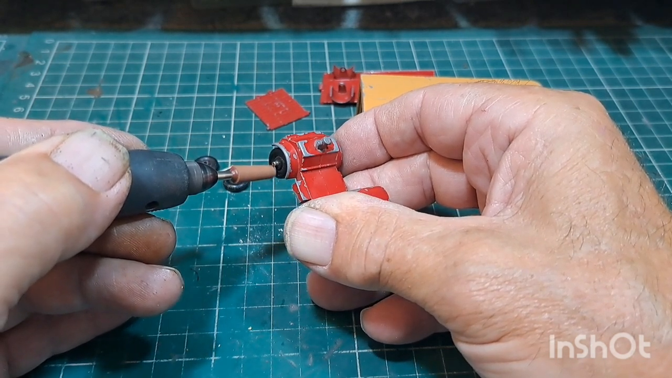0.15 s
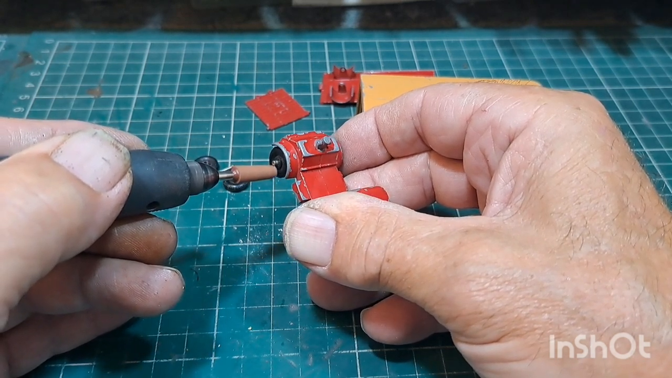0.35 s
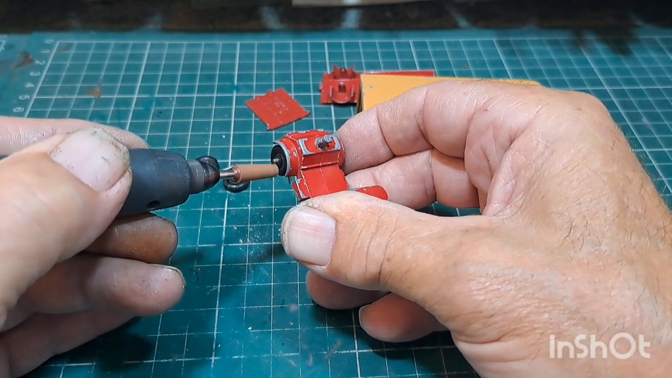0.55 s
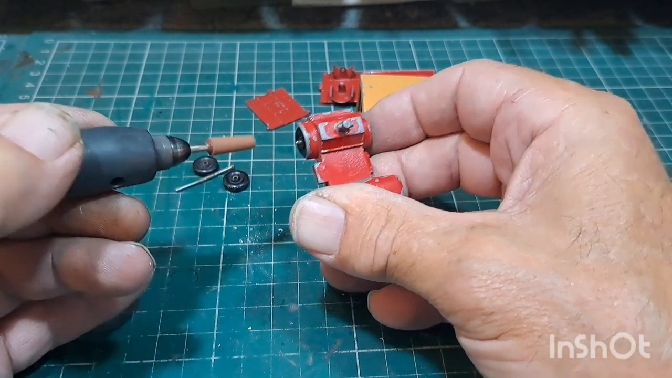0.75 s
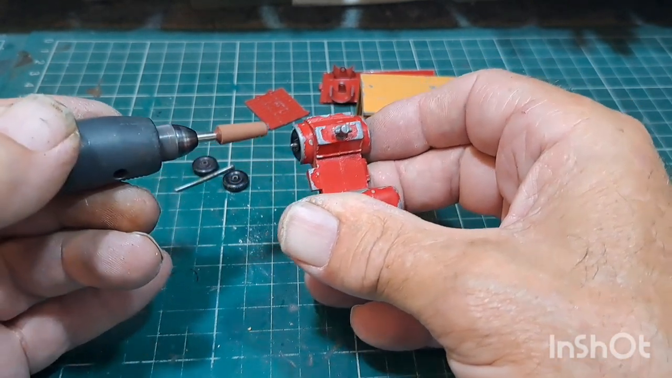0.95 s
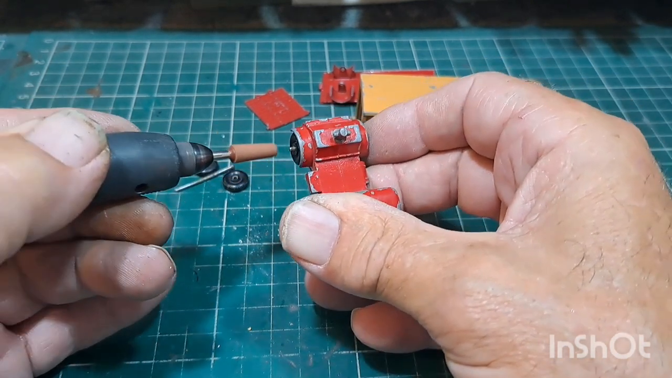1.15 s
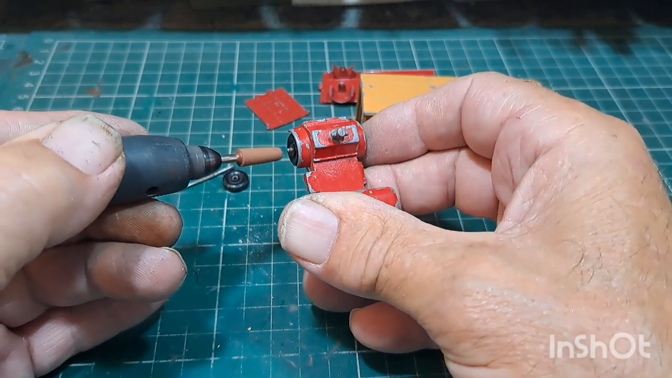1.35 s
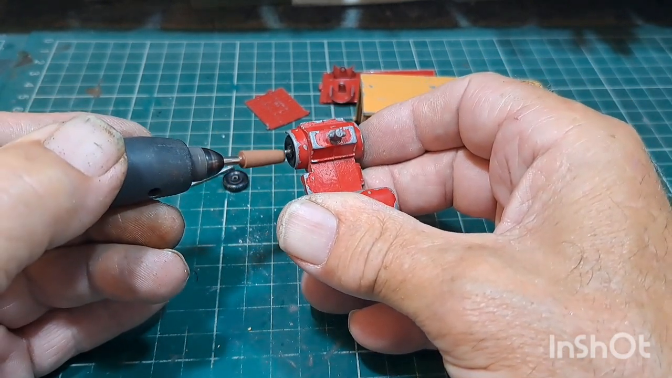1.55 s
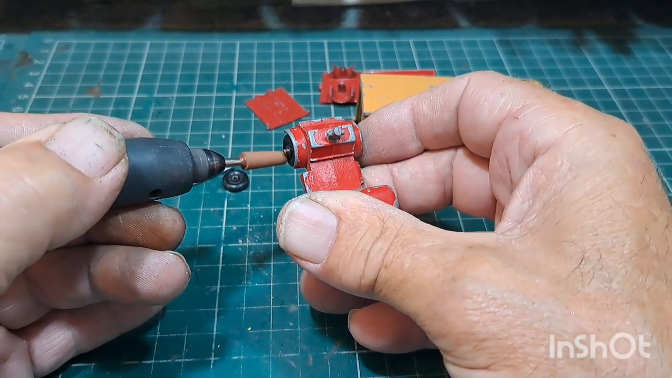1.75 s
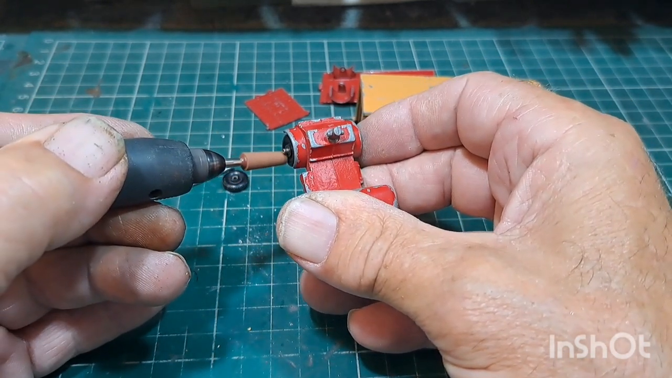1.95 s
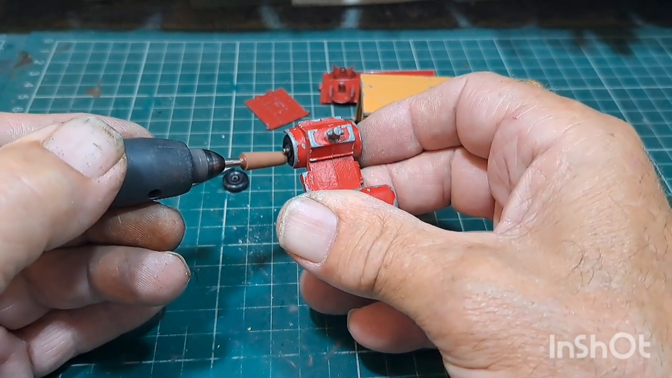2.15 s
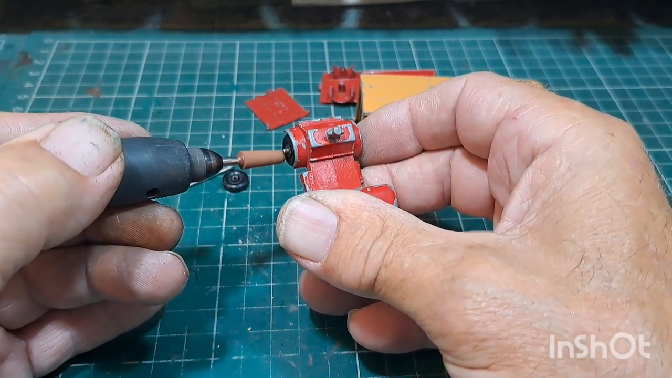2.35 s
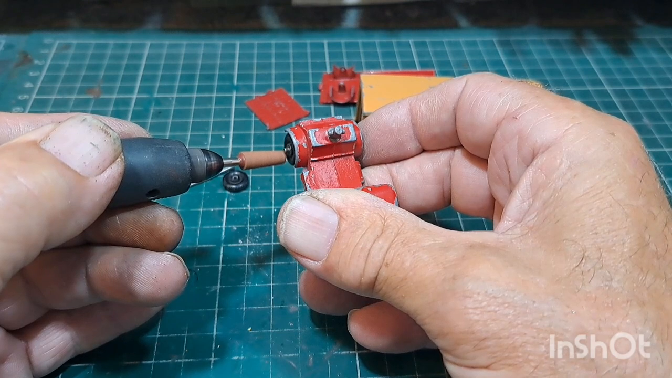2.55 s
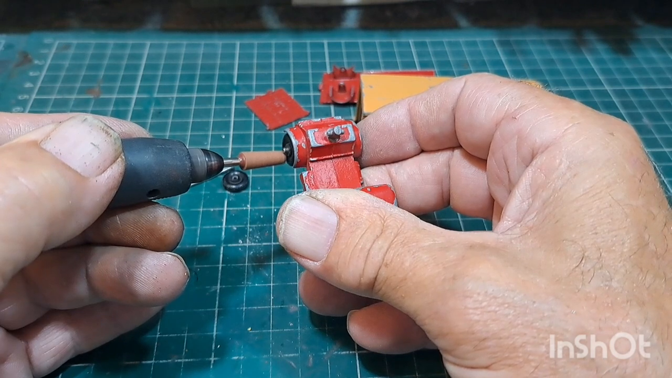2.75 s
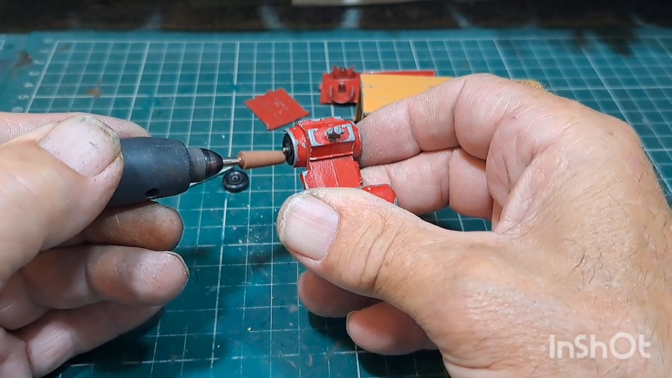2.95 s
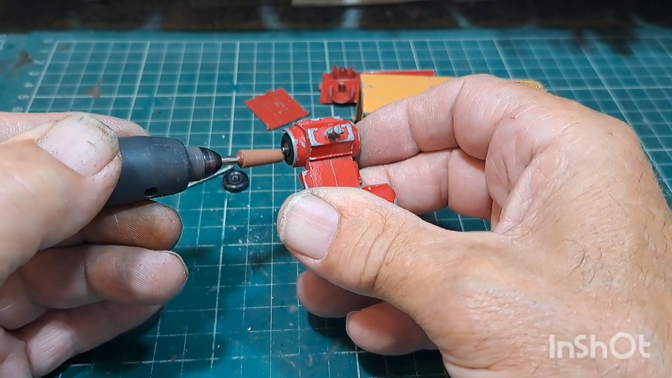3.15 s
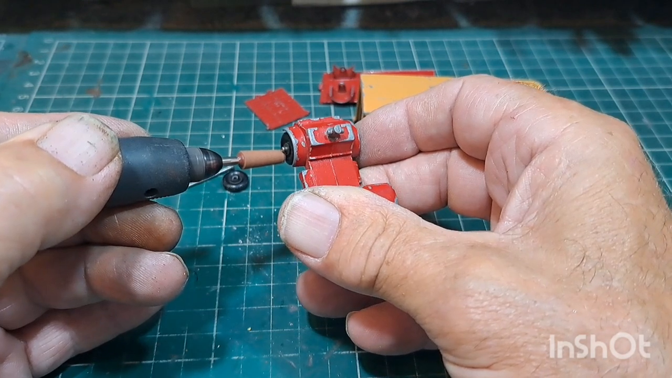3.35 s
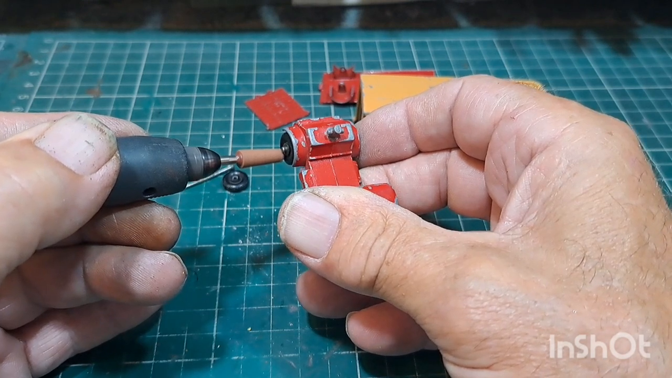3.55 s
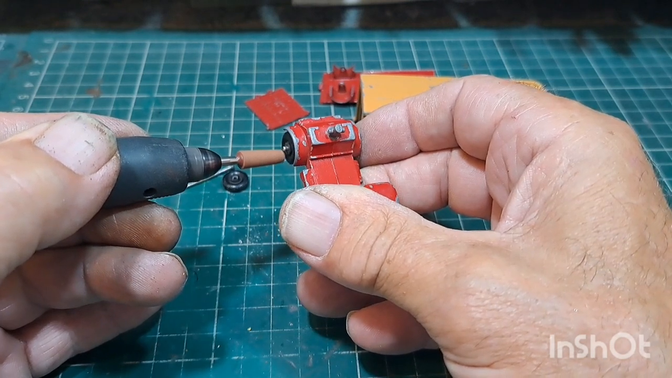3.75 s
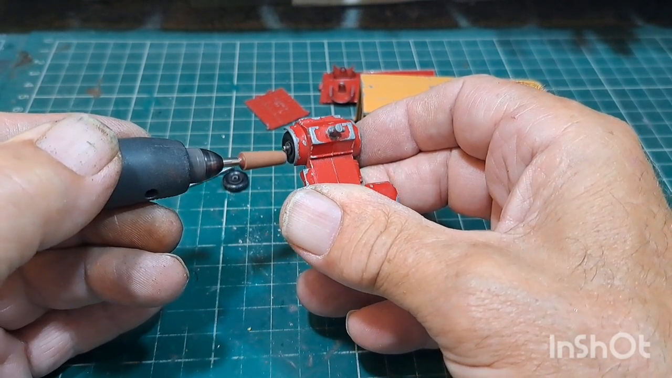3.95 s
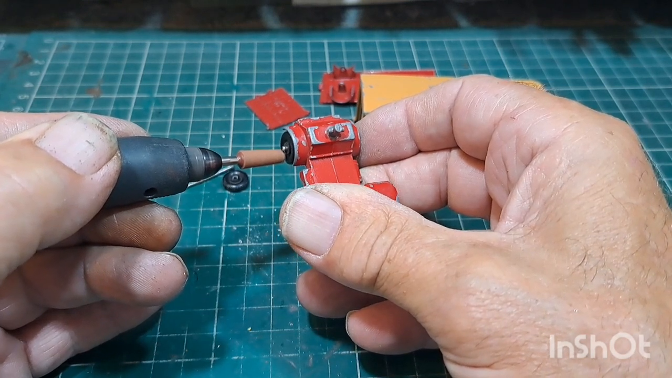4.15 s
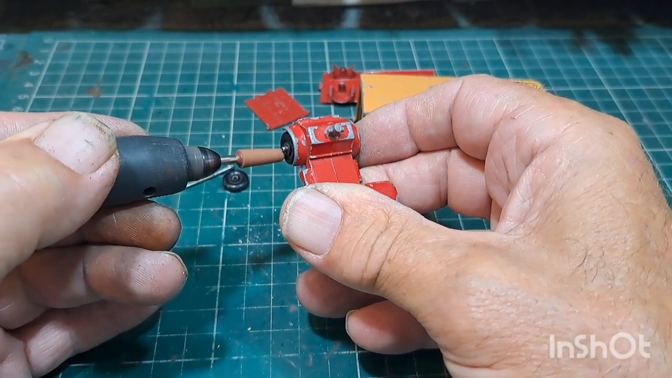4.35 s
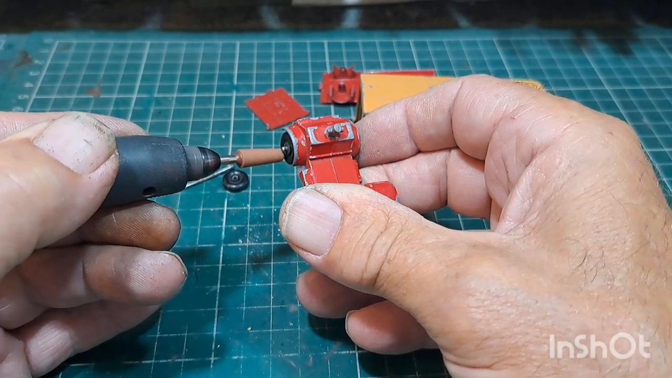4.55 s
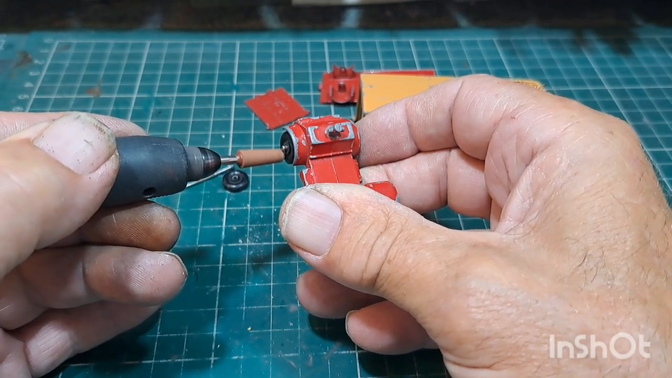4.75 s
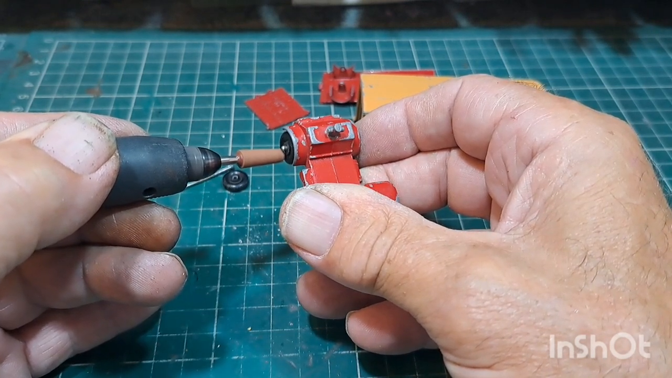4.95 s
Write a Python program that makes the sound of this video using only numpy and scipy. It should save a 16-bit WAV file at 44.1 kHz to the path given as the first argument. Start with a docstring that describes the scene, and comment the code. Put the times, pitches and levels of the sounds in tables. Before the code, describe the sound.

A small handheld rotary tool grinds the end of a metal axle with a bright, buzzing rasp that chatters unevenly. About half a second in, the stone lifts for a second, leaving the motor's soft hum, thin whine and hiss. The grinding returns and runs on, with sharp little bites and a slight metallic ring. It is heard close up at a workbench, over a faint low room rumble.

```python
"""At a workbench, a small rotary tool dresses the end of a metal axle with a grinding stone.
The stone runs out of true and scrapes once a turn; held lightly it bounces, hard and weak in turn.
It is lifted for a second, leaving the motor's hum, bearing whine and brush hiss. The hands knock
softly twice over a low workshop rumble. Bench and room echo the scrape and hiss at two microphones."""
import sys
import numpy as np
from scipy import signal
from scipy.fft import rfft, irfft, next_fast_len
from scipy.io import wavfile
from scipy.ndimage import uniform_filter1d

SR = 44100
rng = np.random.default_rng(int(sys.argv[2]) if len(sys.argv) > 2 else 0)


def to_wav(s):
    """Save 16-bit WAV."""
    ch = np.atleast_2d(s).T  # columns
    pcm = np.round(np.clip(ch, -1, 1) * 32767)  # PCM
    wavfile.write(sys.argv[1], SR, pcm.astype(np.int16))


N = 220617
T = np.arange(N) / SR
MIC_LAG_S = .00032  # the right microphone is further off
FIRM_DB = -18  # feed force of a firm hand


def undb(db):
    """Decibels to gain."""
    return 10 ** (np.asarray(db) / 20)


def unit(x):
    """Scale to rms 1."""
    return x / np.sqrt(np.mean(x ** 2))


def curve(rows):
    """Straight lines through (seconds, value) rows."""
    return np.interp(T, *np.transpose(rows))


def swell(middle_s, half_s):
    """Gaussian rise and fall, peak 1."""
    return np.exp(-((T - middle_s) / half_s) ** 2)


def walk(hz):
    """Smooth random drift, rms 1."""
    step = max(int(SR / hz), 1)
    held = rng.standard_normal(N)[np.arange(N) // step]
    return unit(uniform_filter1d(uniform_filter1d(held, step), step))


def late(x, delay_s):
    """Delay a signal."""
    return np.pad(x, (int(delay_s * SR), 0))[:N]


def pan(x, left_db):
    """Place a sound by its left minus right level."""
    return x * undb(np.array([[left_db], [-left_db]]) / 2)


def resonate(x, hz, width_hz):
    """One resonant mode."""
    return signal.lfilter(*signal.iirpeak(hz, hz / width_hz, fs=SR), x)


def colour(x, spectrum, rings=(), column=1, size=4096):
    """Minimum-phase filter from a (Hz, dB, ..) table, lifted at each ring; unit power gain."""
    freq_hz = np.maximum(np.arange(size // 2 + 1) * SR / size, 1)
    table = np.transpose(spectrum)
    db = np.interp(np.log(freq_hz), np.log(table[0]), table[column])
    db -= 20 * np.log10(1 + (table[0, 0] / 2 / freq_hz) ** 2)  # bass roll-off
    for hz, width_hz, lift_db in rings:
        db += lift_db / (1 + (2 * (freq_hz - hz) / width_hz) ** 2)
    cepstrum = irfft(np.log(undb(db)))
    cepstrum[1:size // 2] *= 2
    cepstrum[size // 2 + 1:] = 0
    response = irfft(np.exp(rfft(cepstrum)))
    return signal.fftconvolve(x, response / np.linalg.norm(response))[:N]


def trail(power, t60_s):
    """Spread a power curve over an exponential decay, keeping its energy."""
    decay = np.exp(-2 * np.log(1000) * T[:SR // 2] / t60_s)
    return np.abs(signal.fftconvolve(power, decay / decay.sum())[:N])


def paths(x, spectrum, rings, near_db, near_t60_s, room_db, room_t60_s):
    """Direct sound, early echoes and a diffuse tail off bench and room, coloured per microphone."""
    # Echoes off bench and hands. Each row: left delay in seconds, right delay in seconds, level in dB.
    echoes = [(.00062, .00121, -10.5), (.00187, .00093, -17.5), (.0031, .00263, -11.5), (.0044, .0053, -11)]
    tail_power = undb(near_db) ** 2 * trail(x ** 2, near_t60_s)
    tail_power += undb(room_db) ** 2 * trail(x ** 2, room_t60_s)
    out = []
    for side in range(2):
        early = x + sum(undb(db) * late(x, delays_s[side]) for *delays_s, db in echoes)
        heard = late(early, side * MIC_LAG_S) + np.sqrt(tail_power) * rng.standard_normal(N)
        out.append(colour(heard * x.std() / heard.std(), spectrum, rings, column=side + 1))
    return np.array(out)


def workshop(room_db=-58, mains_db=-60, mains_hz=100, drone_hz=57):
    """Low rumble, nearly alike on both sides, faint mains hum and a drone that swells twice."""
    # Room rumble. Each row: frequency in Hz, relative density in dB.
    spectrum = [(25, -19), (55, 3), (85, -4.5), (120, -3.5), (170, -0.5), (240, -6.5), (330, -7.5),
                (480, -4.5), (800, -22), (2000, -21)]
    # Drone swells. Each row: middle in seconds, half length in seconds, level in dB.
    swells = [(1.1, .2, -58), (2.03, .08, -58)]
    mid, side = (colour(rng.standard_normal(N), spectrum) for _ in range(2))
    rumble = undb(room_db + 1.7 * walk(4.7)) * (mid + 0.42 * side * np.array([[1], [-1]]))
    drone_gain = sum(undb(db) * swell(middle_s, half_s) for middle_s, half_s, db in swells)
    drone = drone_gain * np.sin(2 * np.pi * drone_hz * T)
    mains = undb(mains_db) * np.sin(2 * np.pi * mains_hz * T)
    return pan(rumble + np.sqrt(2) * (mains + drone), left_db=-2.5)


def knocks():
    """Dull, short knocks as the hands shift."""
    # Knocks. Each row: start in seconds, level in dB, tilt in dB per octave.
    hits = [(0.918, -42, 5.5), (3.784, -43, -16)]
    # Modes of the knocked body. Each row: frequency in Hz, relative level in dB, T60 in seconds.
    modes = [(392, 0.5, 0.1), (450, -6, 0.056), (658, -7, 0.11)]
    out = np.zeros(N)
    for start_s, db, tilt_db in hits:
        age_s = np.maximum(T - start_s, 0)
        for hz, mode_db, t60_s in modes:
            gain = undb(db + mode_db + tilt_db * np.log2(hz / modes[0][0]))
            out += gain * np.exp(-np.log(1000) * age_s / t60_s) * np.sin(2 * np.pi * hz * age_s)
    return pan(out, left_db=-4)


def brief_rush(level_db=-52):
    """A brief, narrow rush that swells and fades."""
    rush = unit(resonate(rng.standard_normal(N), hz=4850, width_hz=300))
    return pan(undb(level_db) * swell(middle_s=1.05, half_s=.15) * rush, left_db=8)


def shaft(load, free_hz=183.5, sag_hz=1.45, inertia_s=0.1):
    """Turns so far; the speed sags under load (1 = a firm hand), lagged by inertia."""
    pole = np.exp(-1 / (inertia_s * SR))
    drag, _ = signal.lfilter([1 - pole], [1, -pole], load, zi=[.5])
    return np.cumsum(free_hz - sag_hz * drag) / SR


def motor(turns, hum_db=-0.2, octave_db=-1, waver_db=1.5, slip_rad=0.67):
    """Unbalance hums at the shaft rate and its octave; bearing lines waver as the balls slip."""
    # Shaft hum. Each row: time in seconds, level in dB before hum_db.
    hum_levels = [(0, -46.5), (.45, -46.5), (.7, -47.5), (1.4, -47.3), (2.25, -43.5), (2.45, -47),
                  (3.1, -45.5), (3.64, -49), (3.73, -57), (3.87, -51), (4.87, -50.5), (5, -54)]
    # Its octave. Each row: time in seconds, level in dB before octave_db.
    octave_levels = [(0, -82), (.57, -59), (1.2, -65.5), (1.65, -56.5), (1.9, -61.5), (2.95, -64.5),
                     (3.6, -52.5), (3.95, -69), (4.4, -58.5), (5, -54)]
    # Motor lines. Each row: multiple of the shaft rate (fractional for bearings), level in dB.
    lines = [(3, -70.5), (4.613, -61.5), (5, -98), (5.613, -57), (6, -63.5), (6.613, -58.5), (9.226, -55),
             (10.226, -52.5), (11.226, -55)]
    hum = undb(curve(hum_levels) + hum_db) * np.sin(2 * np.pi * turns)
    octave_gain = undb(curve(octave_levels) + octave_db + 2.6 * walk(12))
    hum += octave_gain * np.sin(4 * np.pi * turns + .5 * walk(30))
    whine = np.zeros(N)
    for multiple, db in lines:
        gain = undb(db + waver_db * walk(14))
        phase = 2 * np.pi * (multiple * turns + rng.random())
        whine += gain * np.sin(phase + slip_rad * walk(25.24))
    return np.sqrt(2) * (pan(hum, left_db=-5.5) + pan(whine, left_db=2.5))


def grit(spread_db):
    """Dense, grainy noise, a few grains much larger than the rest."""
    return unit(rng.standard_normal(N) * undb(spread_db * np.repeat(rng.standard_normal(N), 6)[:N]))


def brushes(turns, hiss_db=-35.5, ripple=0.18):
    """Brushes and bearings hiss with a restless flutter and a slight ripple each turn."""
    # Brush hiss. Each row: frequency in Hz, left and right relative levels in dB.
    spectrum = [(278, -20, -12.5), (656, -17, -13.5), (990, 0, -6.5), (1540, -6.5, 3), (2140, 5.5, 1),
                (2530, -1.5, -2), (3700, -4.5, -4), (5200, 1.5, -3), (6400, -7, -8.5), (11300, -7.5, -7),
                (11400, 2, -4.5), (13160, -10.5, 1), (14700, -2.5, -38)]
    hiss = grit(spread_db=6.0) * undb(1.27 * walk(300) + 0.21 * walk(19))
    hiss *= 1 + ripple * np.cos(2 * np.pi * turns)
    heard = paths(unit(hiss), spectrum, (), near_db=6.5, near_t60_s=0.012, room_db=4.5, room_t60_s=0.16)
    return undb(hiss_db) * pan(heard, left_db=-0.5)


def hand():
    """Feed force: each stroke eases in, holds and eases off while the hand leans more or less."""
    # Strokes. Each row: touch and lift in seconds, force in dB, attack and release in seconds.
    strokes = [(-.04, 0.622, -22.5, 0.1, 0.054), (1.584, 1.81, -21.5, 0.049, 0.075),
               (1.792, 4.039, -21.5, 0.28, 0.13), (4.049, 4.15, -21, 0.011, 0.032),
               (4.161, 5.1, -22, 0.053, .05)]
    # Lean of the hand. Each row: time in seconds, added force in dB.
    lean = [(.38, -2), (.5, 0), (.6, -2), (2.05, 0.5), (2.12, -1.5), (2.39, 2), (2.48, -3.5), (2.57, 1.5),
            (2.64, -1), (2.95, -0.5), (3.27, 2), (3.43, -3), (3.62, 2.5), (3.87, -3.5), (4.35, -1),
            (4.74, 0), (4.85, 2), (5, 1)]
    feed = np.zeros(N)
    for touch_s, lift_s, db, attack_s, release_s in strokes:
        ramp = np.minimum((T - touch_s) / attack_s, (lift_s - T) / release_s)
        feed += undb(db) * np.clip(ramp, 0, 1)
    return feed * undb(curve(lean))


def bounce(feed, firm_chatter=.3, chatter_per_db=0.04):
    """Chatter 0-1: the lighter the hand, the more the stone bounces."""
    slack_db = FIRM_DB - 20 * np.log10(feed + 1e-9)
    return np.clip(firm_chatter + chatter_per_db * slack_db, 0, 1)


def contacts(turns, chatter, rebound_db=14.5, scatter_db=1.02, wildness=0.75, throw=2.2, jitter_s=.00018):
    """Times and sizes, one contact a turn: a hard one throws the stone off, so the next is weak."""
    times_s = np.interp(np.arange(1, int(turns[-1])), turns, T)
    kick, scatter, jitter = rng.standard_normal((N // 100, 3))[:len(times_s)].T
    looseness = np.interp(times_s, T, chatter)
    swing = np.zeros(len(times_s))
    for k in range(1, len(times_s)):
        swing[k] = np.tanh(wildness * kick[k] - throw * looseness[k] * swing[k - 1])
    sizes = undb(rebound_db * looseness * swing / 2 + scatter_db * scatter)
    sizes /= np.sqrt(uniform_filter1d(sizes ** 2, size=6))  # the hand sets the mean force
    return times_s + jitter_s * jitter, sizes


def pressure(times_s, sizes, rise_s, fall_s, length=600):
    """Sum of contacts, each swelling quickly and letting go more slowly."""
    t = (np.arange(length) - length // 4) / SR
    pulse = np.exp(-np.where(t < 0, (t / rise_s) ** 2, t / fall_s))
    impulses = np.zeros(N)
    np.add.at(impulses, np.clip((times_s * SR).astype(int), 0, N - 1), sizes)
    return np.convolve(impulses, pulse)[length // 4:][:N]


def scrape(uneven_db=4.5):
    """Each abrasive grain meets the metal differently, so five octave bands flicker separately."""
    size = next_fast_len(N)
    grains = rfft(grit(spread_db=3.0), size)
    freq_hz = np.maximum(np.arange(len(grains)) * SR / size, 1)
    octave = np.log2(freq_hz / 1000)
    out = np.zeros(N)
    for share in np.eye(5):
        band = irfft(grains * np.interp(octave, np.arange(5), share), size)[:N]
        out += band * undb(uneven_db * np.tanh(walk(350)))
    return unit(out)


def axle(rub):
    """Two modes of the axle ring with the scraping, most at the first spot ground."""
    # Axle modes. Each row: frequency in Hz, width in Hz.
    modes = [(2170, 260), (5620, 190)]
    # Ringing. Each row: time in seconds, low and high mode levels in dB relative to the rub.
    levels = [(.3, -11.5, -10.5), (.5, -8, -24), (1.6, -16.5, -19), (3.3, -18.5, -19), (5, -25.5, -14.5)]
    out = np.zeros(N)
    for column, (hz, width_hz) in enumerate(modes, start=1):
        ring = resonate(rub, hz, width_hz)
        gain = undb(curve(np.array(levels)[:, [0, column]]))
        out += gain * ring * rub.std() / ring.std()
    return np.array([out, late(out, MIC_LAG_S)])


def grinding(turns, feed, stone_db=1.3, bite_db=-6, bite_rise_s=.0015, drag=0.022, rumble_db=-35):
    """The stone's high side scrapes the axle and at times bites; a firm hand adds drag in between."""
    # Hard bites. Each row: onset in seconds, peak force in dB before bite_db.
    bites = [(0.1255, -8), (0.3431, -7), (0.381, -8), (0.4683, 0.5), (1.5884, -6.5), (1.8459, -8.5),
             (1.9148, -6.5), (1.949, -13), (1.9926, -10), (2.1726, -8), (2.1832, -3), (2.4286, -3),
             (2.4948, -6), (2.5669, -2.5), (2.621, -6), (2.6432, -8), (2.6699, -4.5), (2.6987, -4),
             (2.7865, -7), (2.7967, -1.5), (2.9123, -6.5), (3.707, -2), (3.8686, -10), (3.895, -7),
             (3.984, -7), (4.0104, -11.5), (4.0598, -10.5), (4.0934, -6.5), (4.1039, -7), (4.1255, -3.5),
             (4.1374, -10), (4.1704, -11), (4.1925, -9.5), (4.7137, -3.5)]
    # Scraping. Each row: frequency in Hz, left and right relative levels in dB.
    spectrum = [(315, -27.5, -17.5), (625, -34, -25.5), (830, -12, -30), (1410, -17, -5), (1800, -16, -2.5),
                (2860, -2, -4), (3480, -7.5, -6.5), (4610, 0, 2.5), (5600, -5.5, -12), (7660, -3.5, -4),
                (9370, -8.5, -9), (11050, -2.5, -3), (12270, -0.5, 3), (15240, -5.5, -7)]
    # Rings of axle and stone. Each row: frequency in Hz, width in Hz, lift in dB.
    rings = [(2133, 97, 7.5), (3490, 31, 10), (3770, 114, 10), (4350, 290, 3.5), (5460, 360, 6.5),
             (6470, 58, 6)]
    chatter = bounce(feed)
    times_s, sizes = contacts(turns, chatter)
    onset_s, peak_db = np.transpose(bites)
    bite_s = onset_s + bite_rise_s
    to_bite_s = np.abs(times_s[:, None] - bite_s).min(axis=1)
    sizes *= to_bite_s > 0.0068  # a bite replaces the nearest ordinary contacts
    press = unit(pressure(times_s, sizes, rise_s=0.0012, fall_s=0.0015) + drag * (1 - chatter))
    bite_force = pressure(bite_s, undb(peak_db + bite_db), rise_s=bite_rise_s, fall_s=0.0016)
    rub = (undb(stone_db) * feed * press + bite_force) * scrape()
    rasp = paths(rub, spectrum, rings, near_db=2.5, near_t60_s=0.011, room_db=-6, room_t60_s=0.098)
    # The load shakes the hand-held part. Each row: frequency in Hz, relative level in dB.
    shake = [(60, -3), (120, 3), (200, -27.0), (320, 4.5), (420, -22), (900, -32)]
    rumble = feed * undb(rumble_db) * colour(rng.standard_normal(N), shake)
    return pan(rasp + axle(rub), left_db=-2.03) + rumble


def scene():
    """The hand's force loads one shaft, which drives the hum, the hiss and the scraping."""
    feed = hand()
    turns = shaft(load=feed / undb(FIRM_DB))
    return grinding(turns, feed) + brushes(turns) + motor(turns) + brief_rush() + knocks() + workshop()


def record(dry, peak_limit=.85, top_hz=15800):
    """Clip the highest peaks, then cut the top treble."""
    lowpass = signal.ellip(12, .1, 80, top_hz, fs=SR, output="sos")
    return signal.sosfilt(lowpass, np.clip(dry, -peak_limit, peak_limit))


dry = scene()
out = record(dry)
to_wav(out)
```